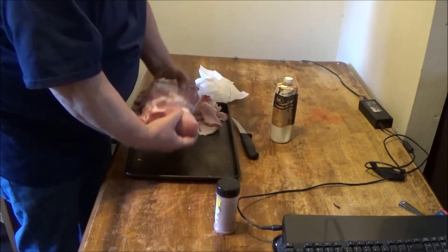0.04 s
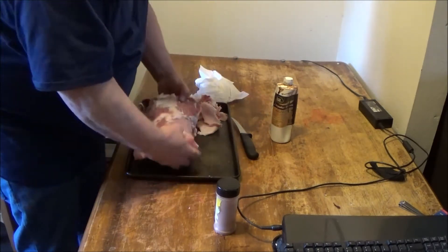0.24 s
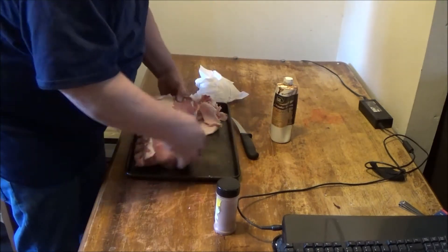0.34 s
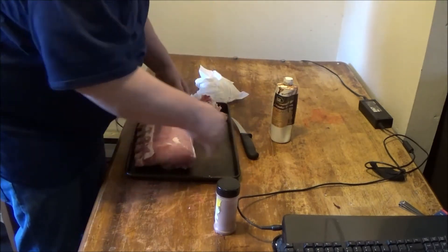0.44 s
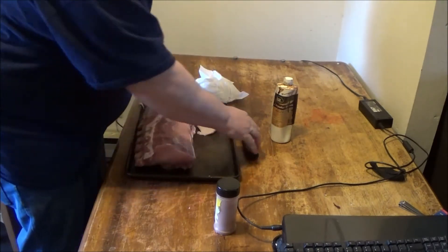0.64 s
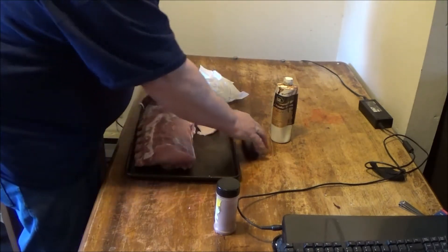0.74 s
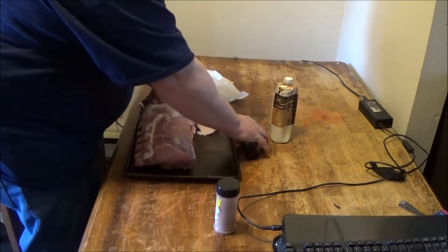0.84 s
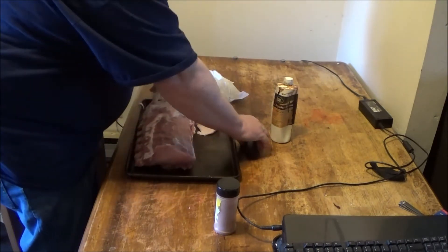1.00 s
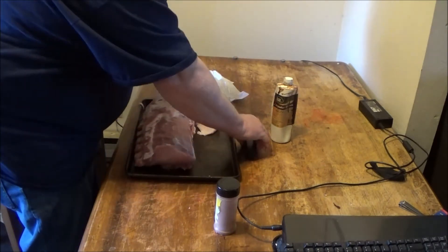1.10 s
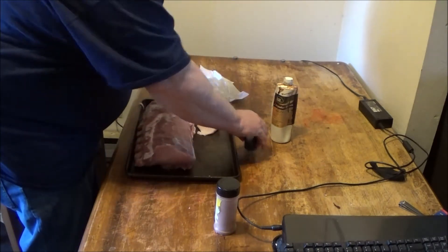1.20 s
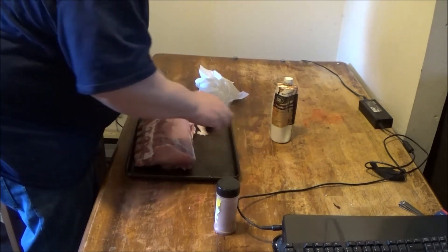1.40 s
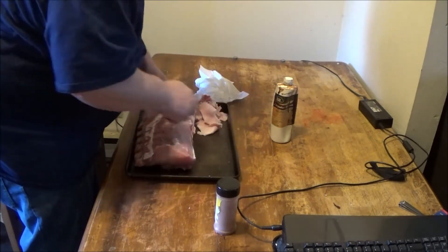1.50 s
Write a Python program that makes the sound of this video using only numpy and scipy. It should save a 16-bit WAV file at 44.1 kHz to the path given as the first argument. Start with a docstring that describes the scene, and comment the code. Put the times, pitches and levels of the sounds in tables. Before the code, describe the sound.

Meat lands with a thud on a nearby metal tray, setting it ringing and clattering briefly on a wooden table. A quieter juddering scrape and light tap from a knife follow, over low hiss in a small room.

```python
"""In a small room, a raw roast is laid on a metal baking tray on a wooden table.
The wet meat ticks as it leaves the hands and lands with a thud that makes the tray ring.
The tray clacks on the wood and rocks to rest. A knife is nudged across the table, juddering,
and let go with a light tap; a sleeve brushes faintly. A rustle fades at the start, and a quiet
hiss, a thin whine and electrical ticking run underneath."""
import sys
import numpy as np
from scipy import signal
from scipy.fft import rfft, irfft
from scipy.io import wavfile

SR = 44100
rng = np.random.default_rng(int(sys.argv[2]) if len(sys.argv) > 2 else 0)


def master_out(mix):
    """Clip the mix to full scale and print it as 16-bit PCM to the path in sys.argv[1]."""
    frames = np.transpose(np.atleast_2d(mix))
    ceiling = np.clip(frames, -1, 1)
    pcm = np.round(ceiling * 32767).astype(np.int16)
    wavfile.write(sys.argv[1], SR, pcm)


N = 68355
BLOW_SAMPLES = round(.8 * SR)


def amp(db):
    """Turns decibels into a gain."""
    return 10 ** (np.asarray(db) / 20)


def unit(x):
    """Scales a sound to an average (rms) level of 1."""
    return x / np.sqrt(np.mean(x ** 2) + 1e-20)


def read(points, hz):
    """Looks up a table's value at any pitch, sliding between its rows."""
    pitches, values = np.transpose(points)
    return np.interp(np.log(hz + 1), np.log(pitches + 1), values)


def level(points):
    """A gain curve through (time_s, level_db) points, silent outside them."""
    return amp(np.interp(np.arange(N) / SR, *np.transpose(points), left=-np.inf, right=-np.inf))


def add(mix, start_s, sound):
    """Mixes a sound in at its start time."""
    part = mix[:, round(start_s * SR):][:, :sound.shape[-1]]
    part += sound[..., :part.shape[1]]


def noise(colour, width, size, corner_hz=np.inf):
    """Stereo noise: colour shapes its tone, width its spread, and it is duller above corner_hz."""
    hz = np.fft.rfftfreq(size, 1 / SR)
    tone = amp(read(colour, hz)) / np.sqrt(1 + (hz / corner_hz) ** 3)
    middle, side = rfft(rng.standard_normal((2, size))) * tone
    side *= amp(read(width, hz))  # side is what differs between left and right
    return unit(irfft(np.array([middle + side, middle - side]), size))


def narrow(centre_hz, width_hz):
    """A narrow band of noise around one pitch."""
    hz = np.fft.rfftfreq(N, 1 / SR)
    return unit(irfft(rfft(rng.standard_normal(N)) / (1 + ((hz - centre_hz) / width_hz) ** 2), N))


def low_cut(x, hz=112):
    """Thins the bass below about 112 Hz."""
    return signal.sosfilt(signal.butter(2, hz, "highpass", fs=SR, output="sos"), x)


# Tone of the steady hiss and of the rustle: pitch_hz, level_db
HISS_COLOUR = [(20, 8), (45, 11), (70, 18.5), (102, 2.5), (135, 11.5), (240, 6), (400, 6.5), (750, 2.5),
               (2200, -1.5), (4000, -2), (6000, -1.5), (8200, -5.5), (9200, -3.5), (11000, -8.5),
               (13500, -12), (16000, -11.5)]
RUSTLE_COLOUR = [(60, -28), (250, 4.5), (700, -3), (1600, -2), (4000, -5), (8000, -10), (15000, -22)]
# Stereo spread of both: pitch_hz, side_db
AIR_WIDTH = [(40, -29), (130, -15), (350, -6), (900, -1), (1900, -2), (3000, -5.5), (6000, -8),
             (9500, -12.5), (12500, -46)]

def background():
    """Room and microphone hiss, a thin high whine and a rustle that dies away."""
    t = np.arange(N) / SR
    hiss = amp(-59.5) * noise(HISS_COLOUR, AIR_WIDTH, N)
    whine = amp(-76.5) * narrow(centre_hz=7880, width_hz=64)
    rustle = amp(-50 - 60 * t / .75) * noise(RUSTLE_COLOUR, AIR_WIDTH, N)
    return hiss + whine + rustle


def electrical_ticking(ticks_per_s=30, first_s=.0305, half_length_s=.0038):
    """Faint, evenly spaced electrical pulses in the microphone."""
    t = np.arange(N) / SR
    from_tick_s = (((t - first_s) * ticks_per_s + .5) % 1 - .5) / ticks_per_s
    pulses = np.exp(-(from_tick_s / half_length_s) ** 2)
    return amp(-65) * narrow(centre_hz=2960, width_hz=330) * pulses


# How long the room echoes: pitch_hz, fade_s (time to drop by 60 dB)
ROOM_FADE = [(100, 0.26), (300, 0.41), (800, 0.38), (2000, 0.34), (5000, 0.26), (9000, 0.27), (15000, .22)]

def room_decay(x, build_cycles=5.5):
    """Each pitch builds up in the room, the bass last, and then dies away."""
    hz, t, bands = signal.stft(x, SR, nperseg=256, noverlap=192)
    build = 1 - np.exp(-np.outer(hz + hz[1], t) / build_cycles)
    fade = amp(-60 * t / read(ROOM_FADE, hz)[:, None])
    return signal.istft(bands * build * fade, SR, nperseg=256, noverlap=192)[1][:, :x.shape[1]]


# Stereo spread of a hit and of its echo: pitch_hz, side_db
NEAR_WIDTH = [(60, -26), (350, -15), (900, -16), (2000, -17), (5000, -14), (9000, -16), (15000, -9)]
ROOM_WIDTH = [(60, -27), (350, -10.5), (900, -8.5), (2000, -8), (5000, -8.5), (9000, -11), (15000, -39)]

def blow(colour, corner_hz, rise_s, fade_s, room_db, build_s):
    """One hit: many short vibrations blur into a crack, and the room answers."""
    t = np.arange(BLOW_SAMPLES) / SR
    shape = (1 - np.exp(-t / rise_s)) * amp(-60 * t / fade_s)
    crack = noise(colour, NEAR_WIDTH, BLOW_SAMPLES, corner_hz) * shape
    echo = room_decay(noise(colour, ROOM_WIDTH, BLOW_SAMPLES, corner_hz))
    return crack + amp(room_db) * echo * (1 - np.exp(-t / build_s))


# Wet ticks: start_s, level_db
TICKS = [(.151, -44), (.154, -52), (.1615, -51), (.1905, -45)]
# Their tone: pitch_hz, level_db
TICK_COLOUR = [(100, -12.5), (3000, -17), (6500, 1), (10500, 0), (16000, -15)]

def meat_ticks():
    """Wet meat unsticks from the hands with tiny bright ticks."""
    out = np.zeros((2, N))
    for start_s, level_db in TICKS:
        tick = blow(TICK_COLOUR, np.inf, rise_s=.00005, fade_s=.012, room_db=-16, build_s=.003)
        add(out, start_s, amp(level_db) * tick)
    return low_cut(out)


# The roast lands, part after part: start_s, level_db, corner_hz (higher is brighter)
THUDS = [(.2112, -16.5, 6840), (.2152, -16, 5040), (0.227, -18.5, 1120), (0.2322, -25.5, 910),
         (0.2433, -21, 1100), (.2575, -21.5, 870)]
# Tone of a thud: pitch_hz, level_db
THUD_COLOUR = [(40, -22), (100, -18), (170, -14.5), (290, 0.5), (450, -5.5), (750, -2), (1800, -3),
               (2900, -9.5), (4000, -11), (8000, -20), (12000, -31.5), (16000, -42)]

def roast_landing():
    """The soft weight slaps onto the tray, which rings as the meat settles."""
    out = np.zeros((2, N))
    for start_s, level_db, corner_hz in THUDS:
        thud = blow(THUD_COLOUR, corner_hz, rise_s=.00028, fade_s=.068, room_db=-8, build_s=.0097)
        add(out, start_s, amp(level_db) * thud)
    ring = tray_ring(np.inf, damping=1.1, rise_s=.0081, by_rim=False)
    add(out, start_s=.2125, sound=amp(-21) * ring)
    return low_cut(out)


# The tray's own notes: pitch_hz, fade_s, roast_db (hit by the meat), rim_db (hit on its rim)
TRAY_NOTES = [(134, 1, -24, -16.5), (201.7, 0.54, -16.5, -13.5), (280.7, 0.39, -6.5, -18.5),
              (353.4, 0.33, -14.5, -2.5), (386.4, 0.11, -13, -3.5), (525, 0.23, -1.5, -6),
              (590, 0.27, -2.5, -0.5), (641.8, 0.25, -1, -9), (752, 0.25, 4, -26), (964, 0.2, -18, -30),
              (1027.5, 0.18, 0.5, -2.5), (1276, 0.09, -35, 8), (1450, 0.073, -19, 13),
              (1738, 0.067, 12, -17), (2650, 0.19, -37, -1.5), (3840, .24, -15, -3), (4440, .28, -26, -15),
              (5254, 0.24, -24, -22), (6880, 0.1, -25, -2)]

def tray_ring(corner_hz, damping, rise_s, by_rim):
    """The struck metal rings at many pitches at once; damping above 1 shortens their fade."""
    t = np.arange(BLOW_SAMPLES) / SR
    ring = np.zeros(len(t))
    for k, (pitch_hz, fade_s, roast_db, rim_db) in enumerate(TRAY_NOTES):
        fade = amp((rim_db if by_rim else roast_db) - 60 * damping * t / fade_s)
        dulling = np.sqrt(1 + (pitch_hz / corner_hz) ** 3)
        ring += (-1) ** k * fade / dulling * np.sin(2 * np.pi * pitch_hz * t)
    return ring * (1 - np.exp(-t / rise_s))


# The tray hits the table: start_s, level_db, corner_hz, ring_db, room_db (both added to level_db)
CLACKS = [(.329, -28.5, 3000, -13, -28), (0.3323, -16, 6800, -14.5, -10.5), (0.3506, -18, 9300, -13, -7),
          (0.3584, -23.5, 5600, -12.5, -4.5), (.451, -28.5, 1950, -11, -7), (0.491, -31.5, 2330, -14, -6.5),
          (0.5567, -36, 1483, -14.5, -7)]
# Sharp metal snaps as the rim hits flat: start_s, level_db
SNAPS = [(0.3316, -20.5), (0.3508, -19), (0.352, -30.5)]
# Tone of each: pitch_hz, level_db
CLACK_COLOUR = [(40, -26), (110, -10.5), (230, -20.5), (340, -5.5), (480, -7), (650, -1.5), (1400, -5),
                (2400, -3.5), (3100, -8), (4000, -6), (7000, -10.5), (10500, -28.5), (13000, -32),
                (16000, -46)]
SNAP_COLOUR = [(200, -34), (2000, -21), (4000, -5.5), (9000, -0.5), (11500, -6), (13000, -20), (16000, -25)]

def tray_rocking():
    """The rim clacks on the wood, ringing each time, as the tray rocks to rest."""
    out = np.zeros((2, N))
    for start_s, level_db, corner_hz, ring_db, room_db in CLACKS:
        clack = blow(CLACK_COLOUR, corner_hz, rise_s=.0005, fade_s=.067, room_db=room_db, build_s=.0022)
        ring = tray_ring(corner_hz, damping=1, rise_s=.0051, by_rim=True)
        add(out, start_s, amp(level_db) * (clack + amp(ring_db) * ring))
    for start_s, level_db in SNAPS:
        snap = blow(SNAP_COLOUR, np.inf, rise_s=.0002, fade_s=.02, room_db=-21, build_s=.0021)
        add(out, start_s, amp(level_db) * snap)
    return low_cut(out)


# The knife's own notes: pitch_hz, width_hz (wider dies sooner), slide_db, tap_db
KNIFE_NOTES = [(374.2, 24, -5, -3.5), (447.5, 9.6, -14.5, -41), (604, 41, 1.5, -26), (745, 26, -16, -33),
               (789, 24.6, -8, -1), (838, 10, -19, -6.5), (900, 12, -21, -11), (1026, 66, -12.5, -27),
               (1350, 120, -12, -5), (1860, 23, -25.5, -24), (3550, 40, -43, -16)]

def knife_ring(force, tapped):
    """Every jolt makes the knife ring briefly against the wood."""
    t = np.arange(SR // 3) / SR
    ring = np.zeros(len(t))
    for k, (pitch_hz, width_hz, slide_db, tap_db) in enumerate(KNIFE_NOTES):
        fade = amp(tap_db if tapped else slide_db) * np.exp(-np.pi * width_hz * t)
        ring += (-1) ** k * fade * np.sin(2 * np.pi * pitch_hz * t)
    return signal.fftconvolve(force, ring * (1 - np.exp(-t / .00067)))[:N]


# How the push on the knife and its scraping hiss rise and fall: time_s, level_db
PUSH = [(.885, -58), (.905, -40), (.94, -39), (.968, -44), (1.0, -58), (1.03, -48), (1.07, -58),
        (1.12, -74)]
SCRAPE = [(.89, -69), (.95, -54.5), (.98, -47), (1.02, -59.5), (1.1, -59), (1.16, -75)]
# Tone of the scrape: pitch_hz, level_db
SCRAPE_COLOUR = [(50, 0), (140, 11.5), (300, 9.5), (1000, -2), (1800, -1), (3000, -5.5), (8000, -10.5),
                 (15000, -30)]

def knife_slide(slips_per_s=202, unevenness=.1):
    """The handle judders over the wood in quick, uneven slips, with a scraping hiss."""
    gap_wobble, size_db = rng.standard_normal((400, 2)).T
    slip_s = PUSH[0][0] + np.cumsum(np.exp(unevenness * gap_wobble)) / slips_per_s
    at = np.round(slip_s * SR).astype(int)
    slips = np.zeros(N)
    slips[at[at < N]] = amp(np.clip(size_db[at < N], -2, 2))
    judder = amp(-1) * knife_ring(slips * level(PUSH), tapped=False)
    return judder + level(SCRAPE) * noise(SCRAPE_COLOUR, ROOM_WIDTH, N)


# The knife's drop and bounce: start_s, strength_db
TAPS = [(1.123, -36.5), (1.139, -36)]
# Tone of the first contact's click: pitch_hz, level_db
TAP_COLOUR = [(100, -10), (800, -5), (2600, -1), (4000, 1.5), (8000, -9), (15000, -42)]

def knife_drop():
    """The knife is let go, taps the table and bounces once."""
    out = np.zeros((2, N))
    ring = amp(-6.5) * knife_ring(signal.unit_impulse(N), tapped=True)
    for start_s, strength_db in TAPS:
        add(out, start_s, amp(strength_db) * ring)
    click = blow(TAP_COLOUR, np.inf, rise_s=.00015, fade_s=.045, room_db=-10, build_s=.005)
    add(out, TAPS[0][0], amp(-48) * click)
    return out


def with_room(sound):
    """Adds the small room's soft echo to a sound."""
    echo = room_decay(rng.standard_normal((2, SR // 2)))
    echo /= np.linalg.norm(echo[0])
    return sound + amp(-14.5) * signal.fftconvolve(sound, echo, axes=1)[:, :N]


# The sleeve's swell and fade: time_s, level_db
BRUSH = [(1.33, -79.5), (1.45, -79.5), (1.51, -64.5), (1.56, -81)]

def sleeve():
    """Cloth brushes faintly as the arm draws back."""
    return level(BRUSH) * narrow(centre_hz=5600, width_hz=900)


def scene():
    """Everything on and around the table."""
    roast_and_tray = meat_ticks() + roast_landing() + tray_rocking()
    knife = with_room(knife_slide() + knife_drop())
    return background() + electrical_ticking() + roast_and_tray + knife + sleeve()


def record(dry):
    """Cuts the very highest treble, above 15800 Hz."""
    low_pass = signal.firwin(511, 15800, window=("kaiser", 9), fs=SR)
    return signal.oaconvolve(dry, low_pass[None], "same")


dry = scene()
out = record(dry)
master_out(out)
```